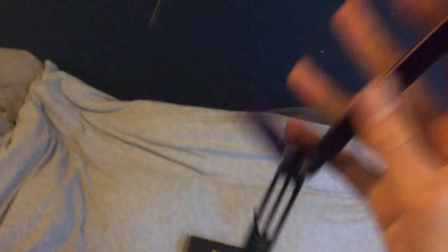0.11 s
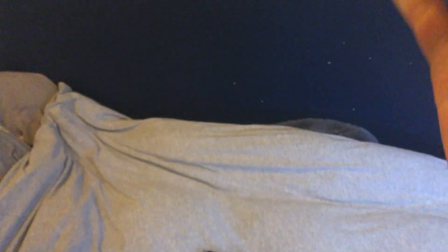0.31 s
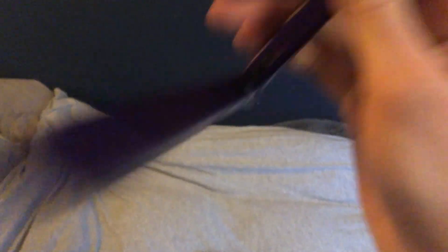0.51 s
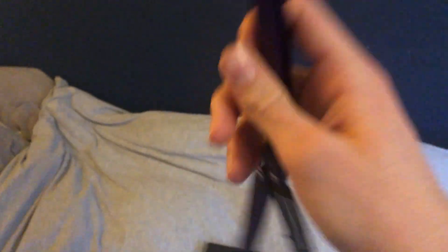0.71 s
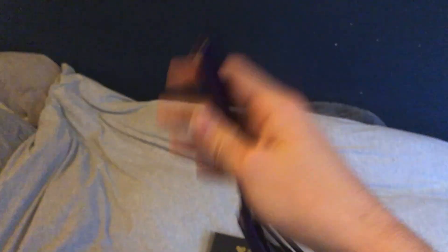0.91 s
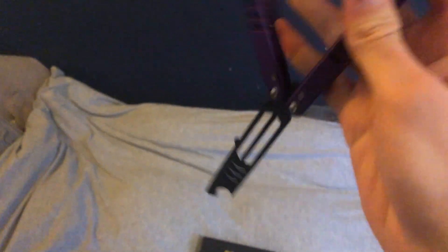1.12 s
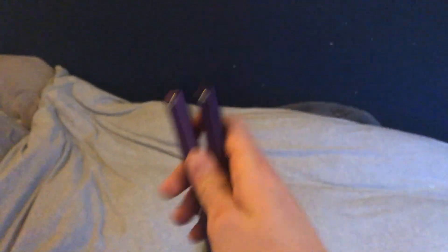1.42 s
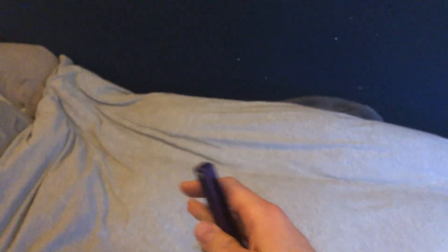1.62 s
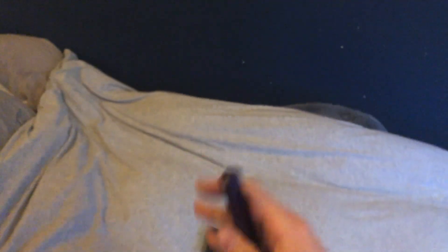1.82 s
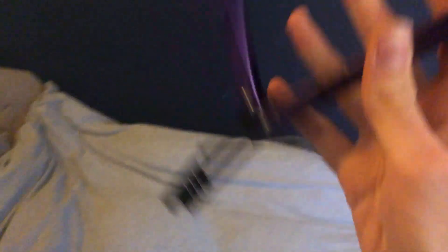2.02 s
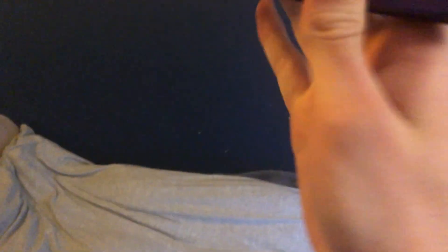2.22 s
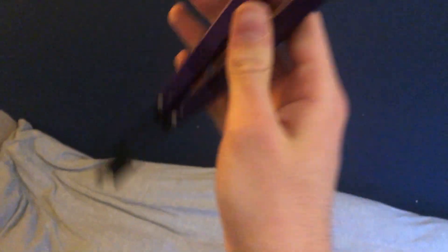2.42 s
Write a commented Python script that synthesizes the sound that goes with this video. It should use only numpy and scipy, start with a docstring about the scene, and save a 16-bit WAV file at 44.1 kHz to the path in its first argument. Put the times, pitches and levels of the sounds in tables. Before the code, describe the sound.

A folding knife trainer flips in hand, sharp bright metallic clacks in bursts, close, quiet room

```python
"""A butterfly knife trainer clacks as it is flipped close to a microphone in a small, quiet room.
Each clack is a short noise burst plus fading sine tones for the ringing handles; ticks are fainter ones.
Faint long sines ring on between clacks. Shaped noise makes the finger slides and dull knocks, and a
falling sine makes one soft thump. Fading noise gives the room's answer, over steady noise and a low hum.
The hardest clacks overload the microphone."""
import sys
import numpy as np
from scipy import signal
from scipy.fft import rfft, irfft
from scipy.io import wavfile

SR = 44100
rng = np.random.default_rng(int(sys.argv[2]) if len(sys.argv) > 2 else 0)


def bounce(signal):
    """Save signal as a 16-bit WAV file at the path given by the first command-line argument."""
    frames = np.transpose(np.atleast_2d(signal))
    limited = np.clip(frames, -1, 1)
    pcm = np.round(limited * 32767).astype(np.int16)
    wavfile.write(sys.argv[1], SR, pcm)


N = 114660  # length of the sound in samples

# A t60 is the time a sound takes to fade by 60 dB. Levels in colour and mode tables are relative.

# Handles striking the stop pins or each other: start_s, crack_db, crack_t60_s, brightness_db_per_octave,
# low_ring_db, main_ring_db, upper_ring_db, main_ring_hz, ring_t60_s, struck_spot_hz
CLACKS = [ (0.0273, -15.5, 0.017, -1, -41, -11.5, -42, 7204, 0.015, 5588),
          (0.2325, -7, 0.017, 3, -22, -8, -28, 7130, 0.064, 8020),
          (0.2535, -7, 0.04, 4, -14.5, -2, -18, 7260, 0.026, 5450),
          (0.272, -6, .02, -1, -13, 3.5, -18, 7375, 0.049, 4200),
          (0.2837, -1.5, 0.017, 4, -13.5, -10, -20, 7230, 0.03, 6260),
          (0.2966, -5.5, 0.0093, 0, -21, -5, -8.5, 7220, .025, 4960),
          (0.303, -19.5, .03, -1, -27.5, -9.5, -20, 7166, 0.094, 5410),
          (0.311, -9.5, 0.023, 2.5, -16.5, -13.5, -15, 7200, 0.034, 3595),
          (1.0664, -6.5, 0.019, -1.5, -21.5, -10, -45, 7340, 0.044, 6560),
          (1.2451, -6, 0.026, 6.5, -26, -13, -24.5, 7445, 0.041, 4970),
          (1.2557, -10.5, 0.012, 5, -25.5, -14, -30.5, 7300, 0.016, 7830),
          (1.2606, -2, 0.015, 2, -28.5, -5.5, -28, 6786, 0.023, 7730),
          (1.2630, -6.5, 0.0097, -2, -30.5, -2, -24, 7630, 0.009, 4800),
          (1.7448, -6.5, 0.013, -2.5, -36.5, -13, -31.5, 7250, 0.068, 3450),
          (2.027, -2, 0.017, -2, -28, -6, -38, 7274, 0.063, 7920),
          (2.1474, -12, 0.014, -3, -26.5, -16.5, -30.5, 7280, .042, 5540),
          (2.1846, 2, 0.017, 2.5, -22, -10, -5.5, 7353, 0.06, 4560),
          (2.194, -22.5, 0.027, 4.5, -24.5, -19, -16.5, 7500, 0.19, 5510),
          (2.2160, -13, 0.019, -2.5, -20.5, -7, -17, 7300, 0.045, 5470),
          (2.2345, -5, 0.028, 5.5, -26, -8.5, -9, 7300, 0.04, 6230),
          (2.2515, -9.5, 0.029, -1, -30.5, -5, -14.5, 7200, 0.076, 5860),
          (2.2745, 0, 0.0079, 2.5, -16, 2, -15.5, 7287, 0.014, 6840),
          (2.3669, -16.5, 0.018, 1, -24, -12.5, -45, 6740, .013, 7300), ]
# Light ticks of the loose pivots: start_s, level_db, brightness_db_per_octave
PIVOT_TICKS = [(0.154, -51.5, -13), (.482, -49.5, -6.5), (.549, -49.5, -4), (.678, -49, 1),
               (1.2394, -31.5, -4.5), (1.514, -46, -5.5), (1.5721, -49, -11), (1.613, -52.5, -20),
               (1.6711, -32.5, -9.5), (1.7291, -24, -4), (2.004, -49.5, -6), (2.3339, -26.5, -3),
               (2.5965, -48, -23.5)]
# Colour of metal striking metal: pitch_hz, level_db
CRACK_COLOUR = [(60, -26.5), (400, -26.5), (1300, -23), (1900, -17.5), (2600, -9), (3300, -11.5),
                (4200, -12), (5000, -4), (6300, -.5), (7200, 4), (8300, -7), (10000, -13.5), (12200, -8),
                (13500, -24), (15500, -21.5)]
# Ringing modes of the handles, in four groups: pitch_hz, level_db, t60_share (times the clack's ring_t60_s)
LOW_MODES = [(2052, -22, 2.2), (2363, -14.5, .9), (2610, -5.5, .7), (2720, -8, 1.5), (2780, -6, 1.2)]
MAIN_MODES = [(5160, -23.5, 0.51), (7600, -11, 0.93), (7314, 2.5, 0.97), (7410, -7.5, 0.97)]
UPPER_MODES = [(12262, 1, 1.0), (12388, -4, 1.0)]
TOP_MODES = [(14905, 0, 1)]
# The mode that a tick rings: pitch_hz, level_db, t60_share (times PIVOT_T60_S)
PIVOT_MODES = [(2311, 0, 0.99)]
# Thin after-ring of the swinging metal: start_s, length_s (until the hand stops it), pitch_hz, level_db,
# t60_s, broadside_s (moment it faces us), half_turns_per_s
AFTER_RINGS = [ (.028, .18, 5023, -54, 1.5, .135, 5), (.028, .2, 6761, -58, 1.8, .15, 7),
               (.028, .12, 2244, -48, .17, .03, 3), (.271, .37, 5023, -40.5, 1.15, .49, 3.5),
               (.3122, .13, 2044, -37, .23, .37, 3), (1.067, 0.34, 5000, -58.5, 2, 1.64, 5),
               (1.262, .41, 5020, -49, 1.3, 1.40, 4.5), (1.746, .28, 6761, -42.5, .85, 1.87, 8),
               (1.746, .26, 5030, -58.5, 1.8, 1.915, 7), (2.027, .16, 6761, -38.5, .9, 2.135, 6),
               (2.275, .42, 5020, -58.5, 2.9, 2.545, 5), ]
# Fingers sliding on the handles: start_s, length_s, level_db
SLIDES = [(0.431, 0.047, -59.5), (0.669, 0.065, -55.5), (0.938, 0.037, -66.5), (2.461, 0.092, -62.5)]
# Colour of skin sliding on metal: pitch_hz, level_db
SLIDE_COLOUR = [(100, -3), (2000, -36), (6500, 8.5), (9000, 2), (13000, 4), (16000, -17)]
# Dull knocks of a handle landing against the gripping hand: start_s, level_db, t60_s
KNOCKS = [(0.2732, -35.5, 0.038), (1.2615, -36.5, 0.025), (1.7458, -49.5, .03), (2.0258, -40.5, 0.015),
          (2.2350, -32.5, 0.018), (2.2750, -24, 0.012)]
# Colour of a knock: pitch_hz, level_db
KNOCK_COLOUR = [(60, -11), (250, -3), (500, -2.5), (1000, 1), (1500, -9.5), (3000, -26), (8000, -51.5)]
# How fast the room's answer dies: pitch_hz, t60_s
ROOM_FADE = [(300, 0.076), (1300, 0.19), (3000, 0.25), (7000, 0.21), (10000, .2), (15000, 0.1)]
# Colour of the room's answer: pitch_hz, level_db
ROOM_COLOUR = [(200, 1.5), (1200, -5), (2600, 0), (5000, -3.5), (7200, -4.5), (10000, -7.5), (12300, -1),
               (13600, -12.5), (15000, -4.5)]
# Colour of the steady room noise: pitch_hz, level_db (per Hz)
FLOOR_COLOUR = [(20, -22.5), (36, -10.5), (52, 1), (90, -16), (135, -5.5), (250, -9.5), (400, -12.5),
                (850, -23.5), (2300, -29.5), (6000, -29), (10000, -34), (15500, -41.5)]

RISE_S = 0.00058  # onset time of cracks, rings and knocks
CONTACT_DB, CONTACT_WIDTH_HZ = 7, 280  # lift at the resonance of the struck spot
MAIN_HZ = 7300  # the pitch at which the main modes are listed
GRIP_DETUNE = .001  # typical random pitch change, as a share
# A handle rings freely while it rebounds, then the grip takes most of the ring.
REBOUND_S, DAMPED_SHARE = 0.011, 0.13
# The top mode follows the crack; bright contacts ring it more.
TOP_DB, TOP_DB_PER_BRIGHTNESS = -22.5, 0.5
# Dull ticks ring the pivot mode more.
TICK_T60_S, PIVOT_T60_S = .018, .05
PIVOT_DB, PIVOT_DB_PER_BRIGHTNESS = -21.5, -1
EDGE_ON_SHARE, STOP_S = .35, .04  # after-ring loudness when edge-on; time the hand takes to stop it
WAVER_HZ, WAVER_DEPTH = 38, .36  # new random waver values per second, and their strength
THUMP_S, THUMP_LENGTH_S, THUMP_DB = 1.2141, .028, -40.5
THUMP_START_HZ, THUMP_END_HZ, THUMP_FALL_S = 735, 100, .0027
ROOM_DB, ROOM_DELAY_S = -7.5, .004
FLOOR_DB = -58.5
HUM_HZ, HUM_WIDTH_HZ, HUM_DB = 137, 8, -66
OVERLOAD = 1.0  # largest level the microphone input can take
LOW_CUT_HZ, HIGH_CUT_HZ = 38, 15620


def amp(db):
    """Turns decibels into a gain."""
    return 10 ** (np.asarray(db) / 20)


def unit(x):
    """Scales a sound to an average (rms) level of 1."""
    return x / np.sqrt(np.mean(x ** 2) + 1e-20)


def read(points, hz):
    """Reads values between the points of a table, with pitch on a log scale."""
    f, value = np.transpose(points)
    return np.interp(np.log(hz + 1), np.log(f + 1), value)


def fade(t, t60):
    """Dies away evenly in decibels, by 60 dB in each t60."""
    return np.exp(-np.log(1000) * t / t60)


def add(mix, s, sound):
    """Adds a sound to the mix at time s, in seconds."""
    part = mix[round(s * SR):][:len(sound)]
    part += sound[:len(part)]


def noise(colour, size, tilt_db=0, contact_hz=None):
    """Random noise with a given colour, tilted about 7000 Hz and lifted where the struck spot resonates."""
    hz = np.fft.rfftfreq(size, 1 / SR)
    octaves = np.log2(np.clip(hz, 2500, 12000) / 7000)
    db = read(colour, hz) + tilt_db * octaves
    if contact_hz:
        db = db + CONTACT_DB * np.exp(-((hz - contact_hz) / CONTACT_WIDTH_HZ) ** 2)
    random_phase = np.exp(2j * np.pi * rng.random(len(hz)))
    return unit(irfft(random_phase * amp(db), size))


def knife():
    """Metal parts hit, giving a crack of noise and setting the handles ringing; loose pivots tick lightly."""
    out = np.zeros(N)
    for (s, crack_db, crack_t60, tilt_db, low_db, main_db, upper_db,
         main_hz, ring_t60, contact_hz) in CLACKS:
        add(out, s, crack(crack_db, crack_t60, tilt_db, contact_hz))
        top_db = crack_db + TOP_DB + TOP_DB_PER_BRIGHTNESS * tilt_db
        add(out, s, ring(LOW_MODES, low_db, ring_t60))
        add(out, s, ring(MAIN_MODES, main_db, ring_t60, main_hz / MAIN_HZ))
        add(out, s, ring(UPPER_MODES, upper_db, ring_t60))
        add(out, s, ring(TOP_MODES, top_db, ring_t60))
    for s, db, tilt_db in PIVOT_TICKS:
        add(out, s, crack(db, TICK_T60_S, tilt_db))
        pivot_db = db + PIVOT_DB + PIVOT_DB_PER_BRIGHTNESS * tilt_db
        add(out, s, ring(PIVOT_MODES, pivot_db, PIVOT_T60_S))
    return out


def crack(db, t60, tilt_db, contact_hz=None):
    """The contact itself: a dense burst of quickly damped vibration, made from noise."""
    t = np.arange(1024) / SR
    rise = np.minimum(t / RISE_S, 1)
    return amp(db) * noise(CRACK_COLOUR, len(t), tilt_db, contact_hz) * rise * fade(t, t60)


def ring(modes, db, t60, pitch=1):
    """A struck handle vibrates at several pitches at once, until the hand damps it."""
    t = np.arange(SR // 5) / SR
    tones = np.zeros(len(t))
    for hz, level, share in modes:
        detune = 1 + GRIP_DETUNE * rng.standard_normal()
        tone = np.sin(2 * np.pi * hz * pitch * detune * t)
        tones += amp(level) * fade(t, t60 * share) * tone
    grip = DAMPED_SHARE + (1 - DAMPED_SHARE) / (1 + (t / REBOUND_S) ** 10)
    rise = 1 - np.exp(-t / RISE_S)
    return amp(db) * tones * grip * rise


def after_ring():
    """The thin, faint ring of the swinging metal, added dry without the room's answer."""
    out = np.zeros(N)
    for s, length, hz, db, t60, broadside_s, half_turns in AFTER_RINGS:
        add(out, s, sing(length, hz, db, t60, broadside_s - s, half_turns))
    return out


def sing(length, hz, db, t60, broadside_s, half_turns):
    """One long-lived mode: turning metal sends most sound broadside; it wavers until the hand stops it."""
    t = np.arange(0, length, 1 / SR)
    turn = abs(np.cos(np.pi * half_turns * (t - broadside_s)))
    facing = EDGE_ON_SHARE + (1 - EDGE_ON_SHARE) * turn
    # A complex waver shifts both the loudness and the phase of the tone.
    real, imag = rng.standard_normal((2, 64))
    waver = 1 + WAVER_DEPTH * np.interp(t * WAVER_HZ, np.arange(len(real)), real + 1j * imag)
    tone = (waver * np.exp(2j * np.pi * hz * t)).imag
    stop = np.minimum((length - t) / STOP_S, 1)
    return amp(db) * fade(t, t60) * facing * stop * tone


def hand():
    """Skin rubs on the handles and soft flesh dulls their knocks; one thump falls as the knife is to shut."""
    out = np.zeros(N)
    for s, length, db in SLIDES:
        size = round(length * SR)
        add(out, s, amp(db) * np.hanning(size) * noise(SLIDE_COLOUR, size))
    t = np.arange(SR // 8) / SR
    rise = np.minimum(t / RISE_S, 1)
    for s, db, t60 in KNOCKS:
        add(out, s, amp(db) * noise(KNOCK_COLOUR, len(t)) * rise * fade(t, t60))
    thump_hz = THUMP_END_HZ + (THUMP_START_HZ - THUMP_END_HZ) * np.exp(-t / THUMP_FALL_S)
    release = np.cos(np.pi / 2 * np.minimum(t / THUMP_LENGTH_S, 1))
    thump = np.sin(2 * np.pi * np.cumsum(thump_hz) / SR)
    add(out, THUMP_S, amp(THUMP_DB) * release * thump)
    return out


def room(x):
    """The walls send back dense reflections, each pitch band dying at its own speed."""
    hz, t, bands = signal.stft(rng.standard_normal(SR // 2), SR, nperseg=256)
    bands = bands * fade(t, read(ROOM_FADE, hz)[:, None])
    plain_tail = signal.istft(bands, SR, nperseg=256)[1]
    colour = amp(read(ROOM_COLOUR, hz))[:, None]
    tail = signal.istft(bands * colour, SR, nperseg=256)[1]
    tail = tail / np.linalg.norm(plain_tail)
    out = np.zeros(N)
    add(out, ROOM_DELAY_S, signal.fftconvolve(x, tail))
    return amp(ROOM_DB) * out


def background():
    """Faint steady noise, and a low hum that wavers because it is a narrow band of noise."""
    hz = np.fft.rfftfreq(N, 1 / SR)
    narrow = 1 / (1 + ((hz - HUM_HZ) / HUM_WIDTH_HZ) ** 2)
    hum = irfft(rfft(rng.standard_normal(N)) * narrow, N)
    return amp(FLOOR_DB) * noise(FLOOR_COLOUR, N) + amp(HUM_DB) * unit(hum)


def scene():
    """Knife and hand in the room, with the after-ring and the background added."""
    near = knife() + hand()
    return (near + room(near) + after_ring() + background())[None]


def record(dry):
    """The microphone input flattens peaks that are too loud, then the lowest and highest pitches are cut."""
    # Clip at four times the sample rate, to avoid false tones.
    fine = signal.resample_poly(dry, 4, 1, axis=1)
    clipped = signal.resample_poly(np.clip(fine, -OVERLOAD, OVERLOAD), 1, 4, axis=1)
    low_cut = signal.butter(2, LOW_CUT_HZ, "high", fs=SR, output="sos")
    high_cut = signal.firwin(511, HIGH_CUT_HZ, window=("kaiser", 7), fs=SR)
    return signal.oaconvolve(signal.sosfilt(low_cut, clipped), high_cut[None], "same")


dry = scene()
out = record(dry)
bounce(out)
```